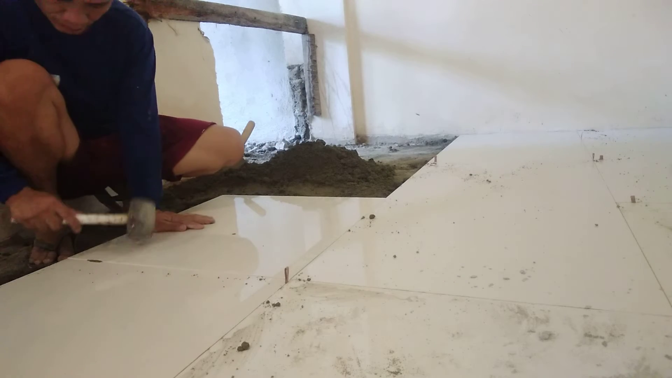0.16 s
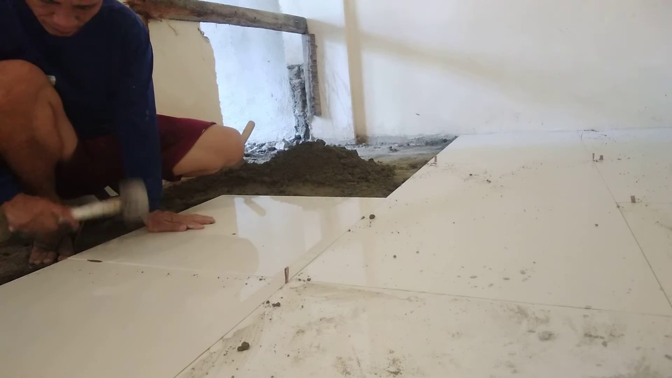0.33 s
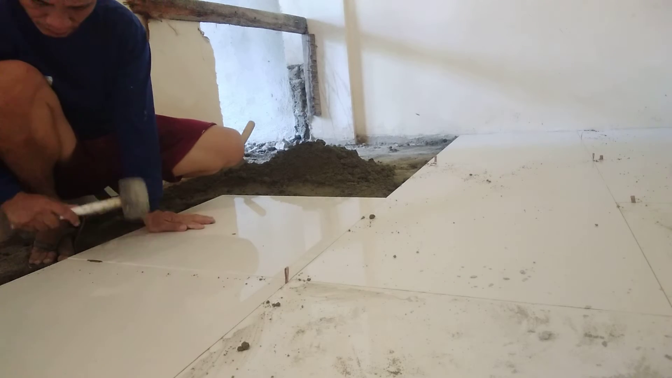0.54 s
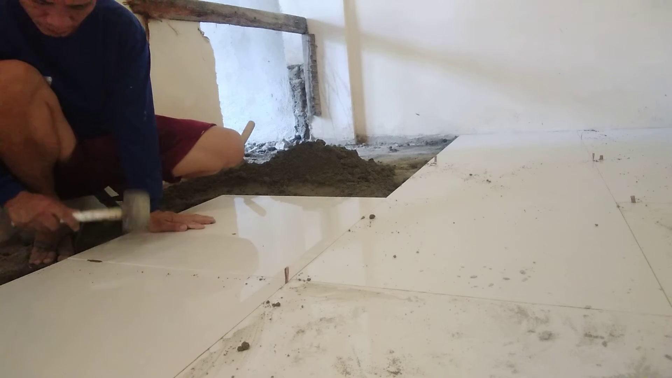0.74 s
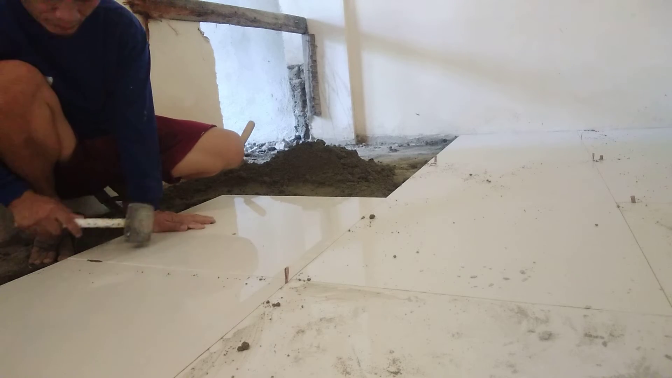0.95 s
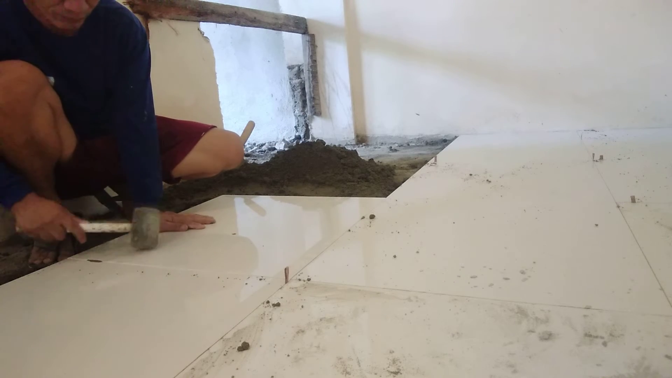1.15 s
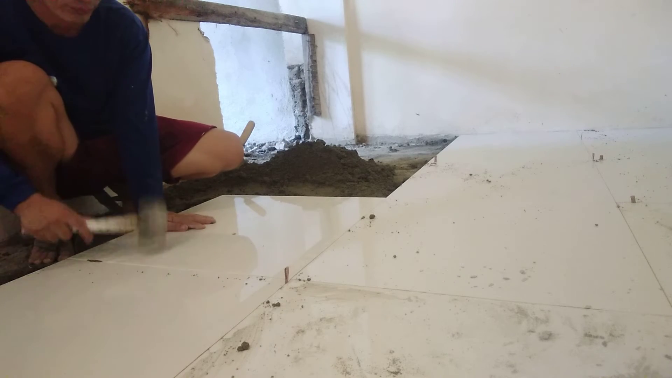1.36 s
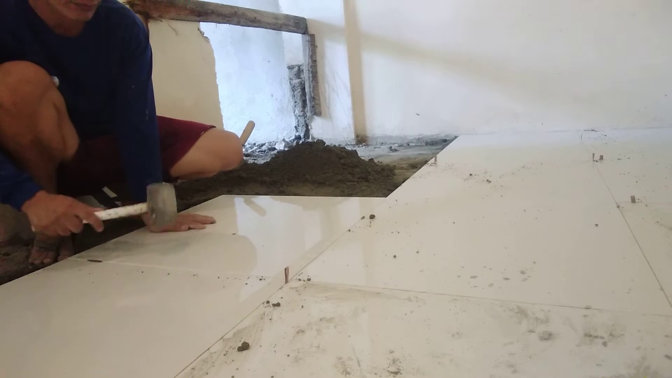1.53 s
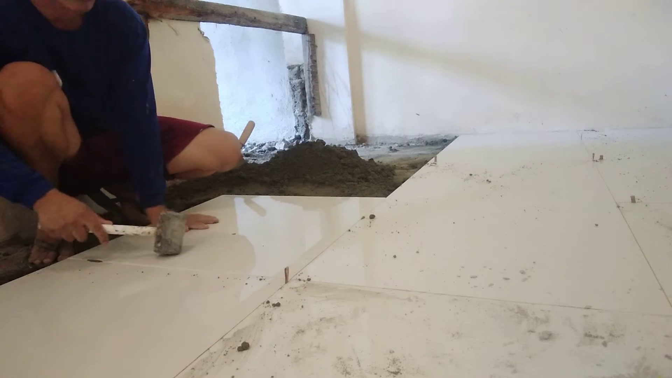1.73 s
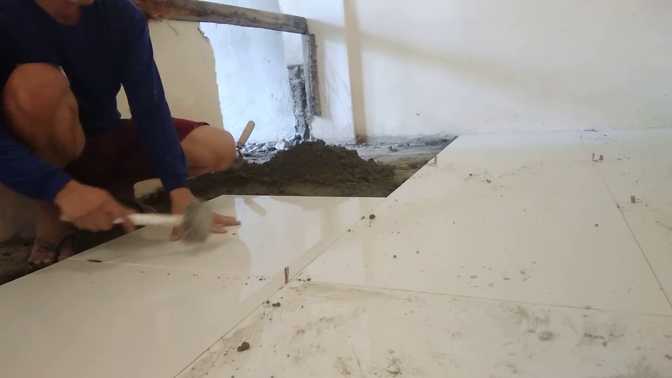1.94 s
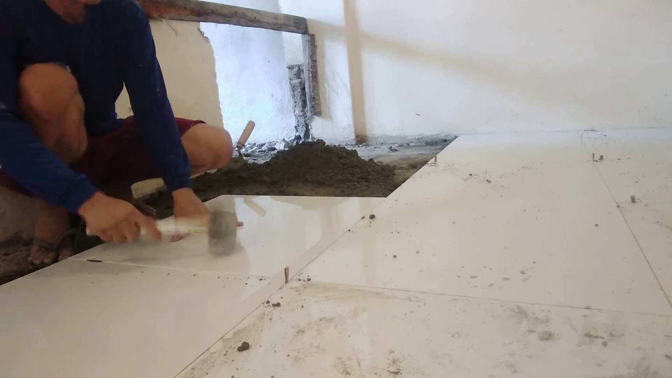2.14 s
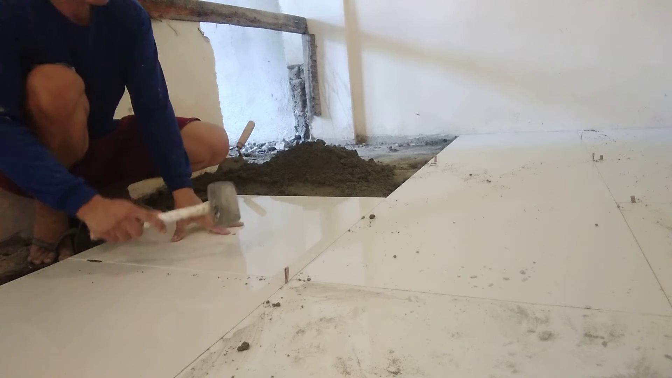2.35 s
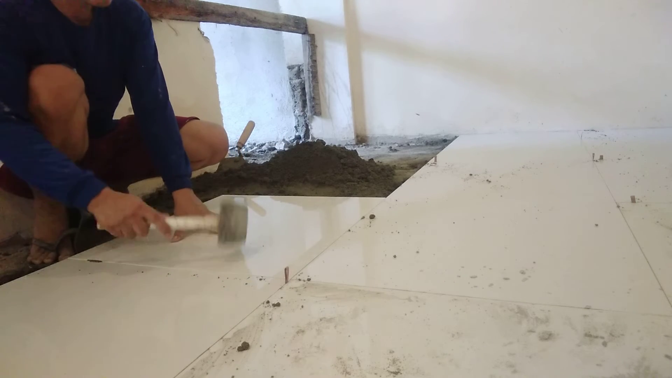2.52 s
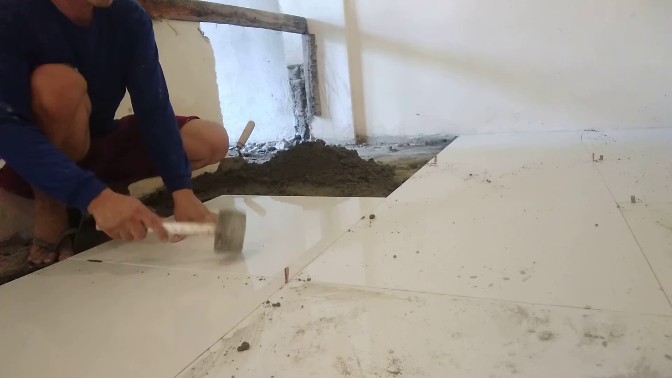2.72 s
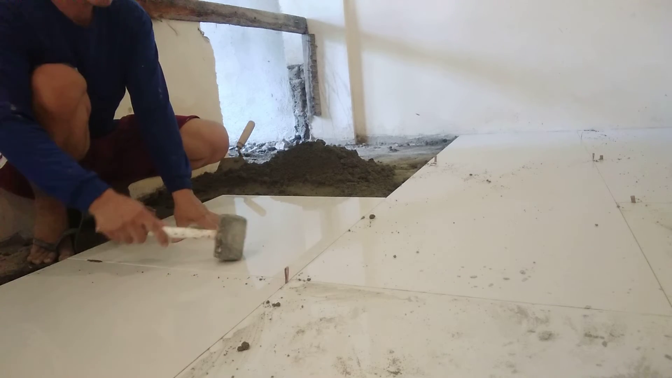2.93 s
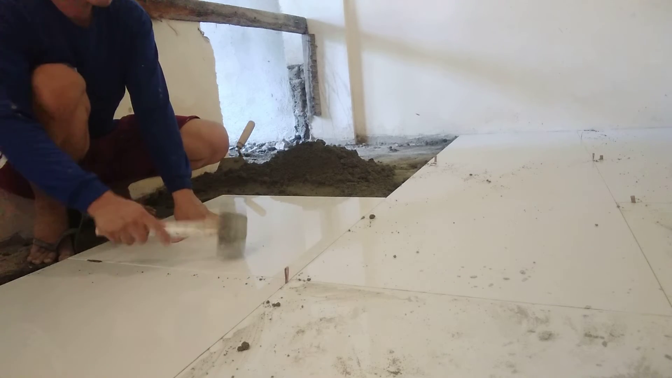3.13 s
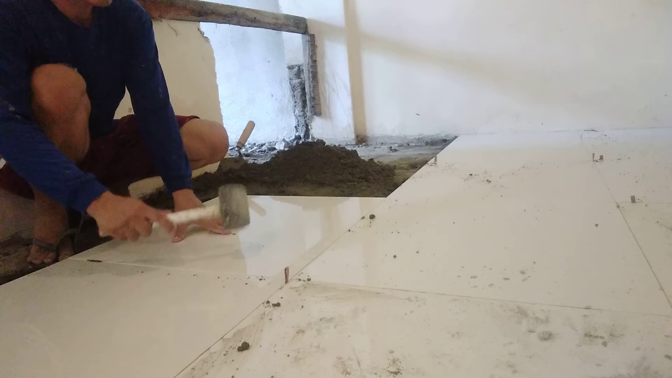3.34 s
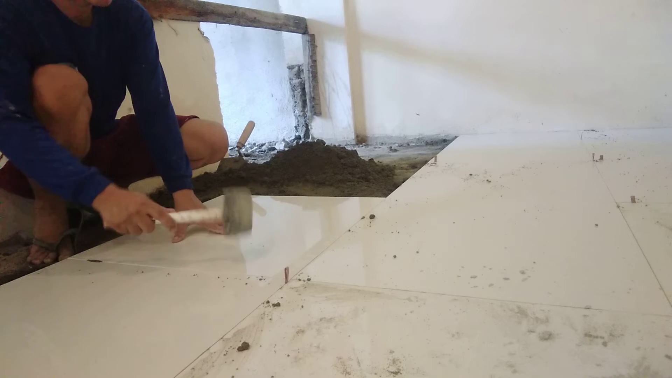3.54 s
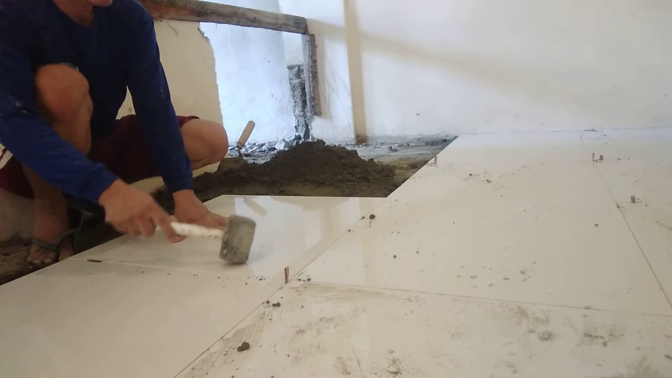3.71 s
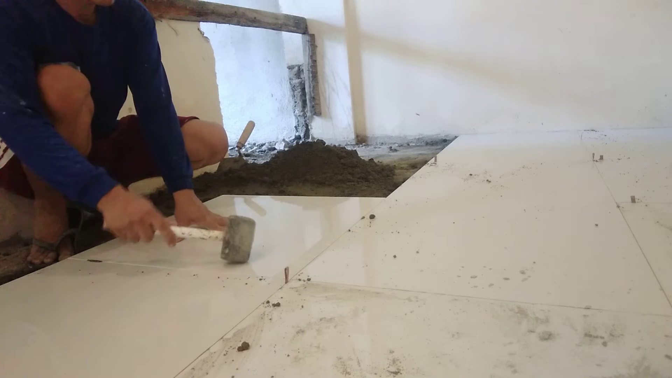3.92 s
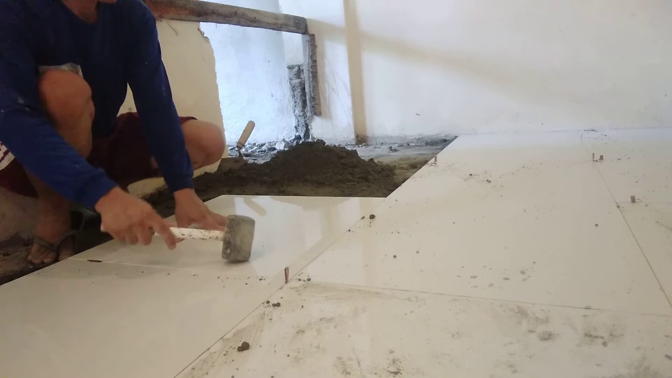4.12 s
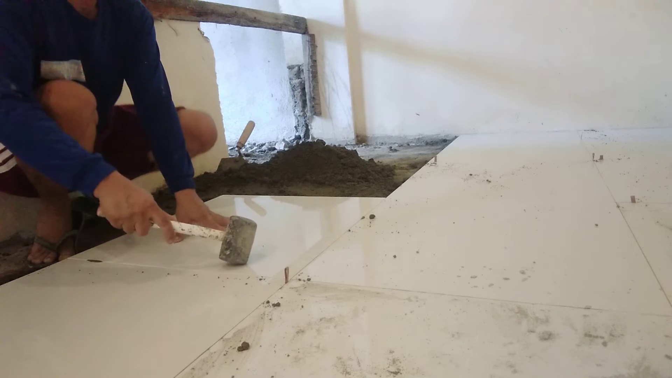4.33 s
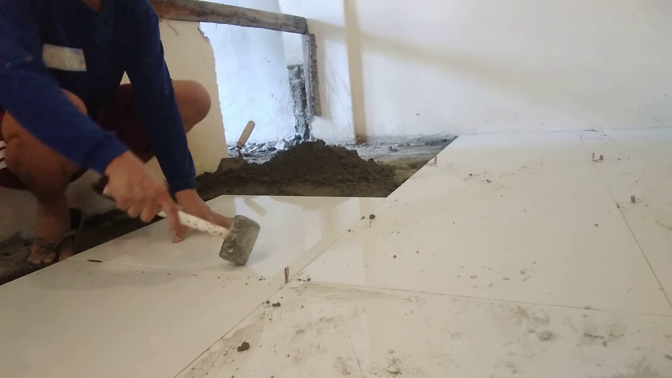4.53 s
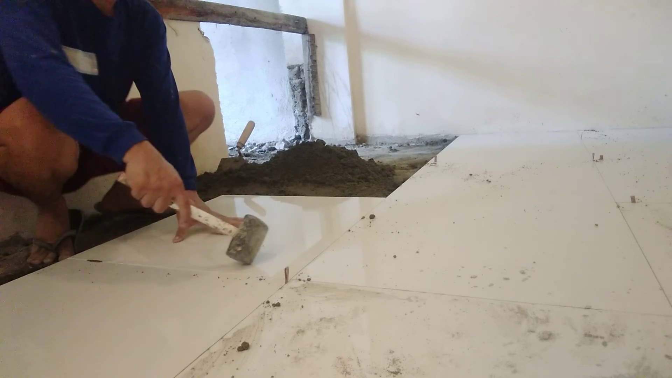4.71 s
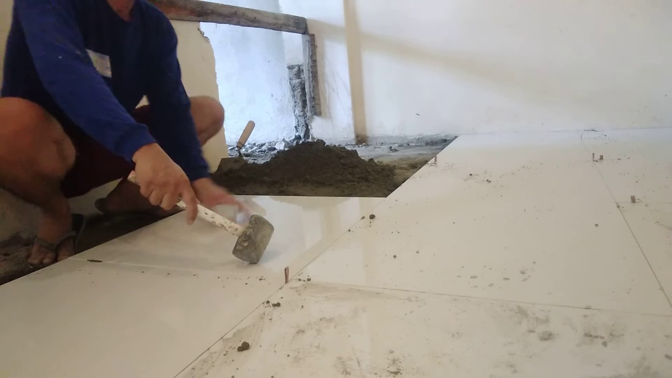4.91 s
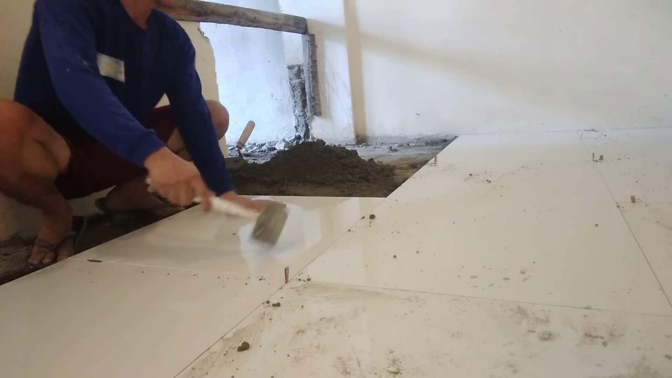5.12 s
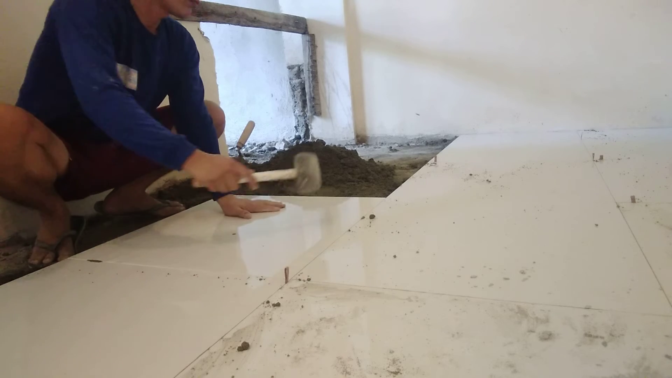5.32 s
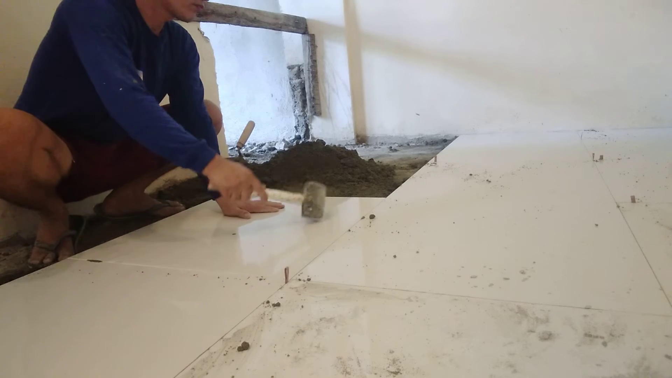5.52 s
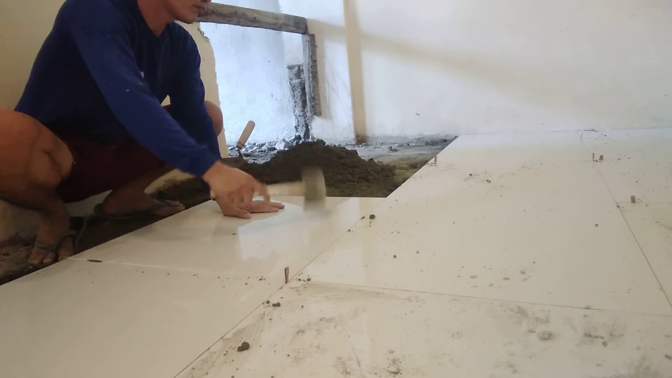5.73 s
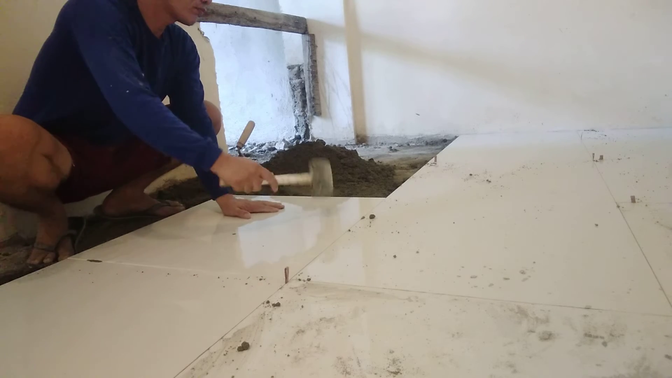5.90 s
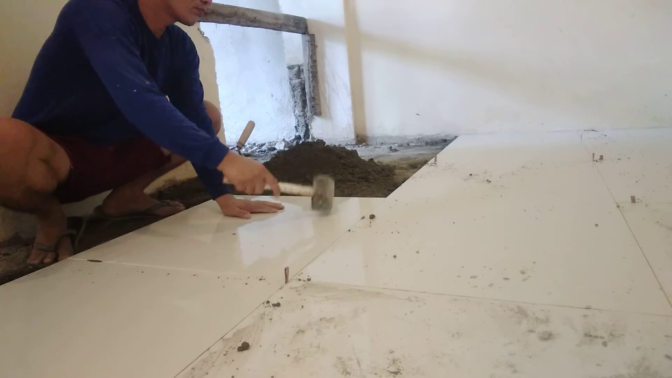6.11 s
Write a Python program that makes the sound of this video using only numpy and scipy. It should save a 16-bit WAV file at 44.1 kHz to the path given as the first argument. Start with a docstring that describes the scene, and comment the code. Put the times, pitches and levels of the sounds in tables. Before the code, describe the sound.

Evenly spaced hollow mallet thuds on a mortar-bedded tile, each with a gritty click and roomy boom, pausing briefly for sandy scuffing and shifting.

```python
"""A rubber mallet beds a large ceramic floor tile in fresh mortar: three runs of taps on three spots.
Each tap sums damped bending modes, clicks and crushed grit, and booms on in lingering resonances and
the diffuse field of a bare plastered room. Feet, hand and mallet scuff the gritty floor as enveloped
noise with narrow squeaks, over the low noise of the room and a few faint tones.
A small microphone with a bright top and a peak limiter picks it up."""
import sys
import numpy as np
from scipy import signal
from scipy.fft import rfft, irfft
from scipy.io import wavfile
from scipy.ndimage import uniform_filter1d, minimum_filter1d

SR = 44100
rng = np.random.default_rng(int(sys.argv[2]) if len(sys.argv) > 2 else 0)


def file_out(sig):
    """Save sig as 16-bit WAV at sys.argv[1]."""
    # one column per channel
    cols = np.atleast_2d(sig).T
    # limit, then scale
    lim = np.clip(cols, -1, 1)
    pcm = np.round(lim * 32767).astype(np.int16)
    wavfile.write(sys.argv[1], SR, pcm)


N = 271656


def amp(db):
    """Level to gain: 20 dB is a factor of ten in amplitude."""
    return 10 ** (np.asarray(db) / 20)


def unit(x):
    """Normalisation to an rms of 1."""
    return x / np.sqrt(np.mean(x ** 2) + 1e-20)


def along(points, hz):
    """Interpolation of (f/Hz, value) points on a logarithmic frequency axis."""
    f, v = np.transpose(points)
    return np.interp(np.log(hz + 1), np.log(f + 1), v)


def bell(hz, centre_hz, octaves):
    """Gaussian hump of height 1 in log frequency; octaves is its standard deviation."""
    return np.exp(-.5 * (np.log2((hz + 1) / centre_hz) / octaves) ** 2)


def causal(db):
    """Minimum-phase response by cepstral folding, for a gain in dB on a 1 Hz grid."""
    cepstrum = irfft(np.log(amp(db) + 1e-6), SR)
    cepstrum[1:SR // 2] *= 2
    cepstrum[SR // 2 + 1:] = 0
    return np.exp(rfft(cepstrum))


def delayed(s):
    """Pure delay of s seconds: a phase falling linearly with frequency."""
    return np.exp(-2j * np.pi * np.fft.rfftfreq(SR, 1 / SR) * s)


def noise(spectrum, size):
    """Random noise of rms 1, coloured by spectral weighting."""
    weight = amp(along(spectrum, np.fft.rfftfreq(size, 1 / SR)))
    return unit(irfft(rfft(rng.standard_normal(size)) * weight, size))


def burst(t60):
    """Spectrum of an exponentially dying noise burst of energy 1."""
    crackle = rng.standard_normal(SR) * amp(-60 * np.arange(SR) / SR / t60)
    return rfft(crackle / np.linalg.norm(crackle))


def faded(x):
    """Window that takes the last fifth of x to silence."""
    return x * np.clip(np.linspace(5, 0, len(x)), 0, 1) ** 4


def add(track, s, sound):
    """Superposition of a sound on the track from time s, cut at the track's ends."""
    start = round(s * SR)
    part = sound[max(-start, 0):max(N - start, 0)]
    track[max(start, 0):][:len(part)] += part


def room_tail(gap=0.0086, build=0.0039):
    """Diffuse field: one second of dense reflections, even in colour, whose treble decays first."""
    # reverberation time: f/Hz, t60/s
    decay = [(100, 1), (500, 0.74), (1500, 0.64), (4000, 0.56), (8000, 0.56), (16000, 0.37)]
    hz, t, z = signal.stft(rng.standard_normal(SR), SR, nperseg=256)
    dying = z * amp(-60 * t / along(decay, hz)[:, None])
    tail = signal.istft(dying, SR, nperseg=256)[1][:SR]
    # silent for the gap, then a linear rise (both in s)
    swell = np.clip((np.arange(SR) / SR - gap) / build, 0, 1)
    field = rfft(tail * swell)
    # dividing by the smoothed spectrum evens the colour and brings the energy to about 1
    field /= np.sqrt(uniform_filter1d(np.abs(field) ** 2, size=90))
    return rfft(faded(irfft(field, SR) * swell))


def lingering_resonances(spot, t60=0.71, build=0.0018):
    """Lingering resonances: room modes, plus a high ring of the tile near 1.7 kHz, strongest at the first spot."""
    # f/Hz, then level/dB from the first, second and third spot
    resonances = [(71, -58, -51.5, -56), (87.4, -57.5, -57, -54), (109.8, -49, -48.5, -47.5),
                  (135.9, -52.5, -50, -47), (159.3, -59, -56.5, -50), (184.9, -56, -52, -52.5),
                  (196.2, -61, -58.5, -53), (235.8, -69, -74.5, -54), (287, -52.5, -54, -64),
                  (301.9, -63, -57, -57.5), (331, -81, -68, -61), (362.6, -56, -100, -65),
                  (388.3, -59, -65, -60.5), (431, -62.5, -58, -64), (455, -58.5, -60, -58),
                  (482.6, -53.5, -71, -73), (508.5, -65.5, -63.5, -75), (542, -65, -65, -62.5),
                  (567, -62, -60.5, -69), (643, -57, -62, -75), (643, -97, -58.5, -64),
                  (698, -74, -54.5, -53), (740, -57.5, -57.5, -65), (781, -55, -88, -78),
                  (848, -55, -72, -78), (932, -56, -77, -66), (1010, -58, -67, -78), (1727, -48, -68, -75)]
    # they begin after 7 ms and then build up
    t = np.maximum(np.arange(SR) / SR - .007, 0)
    ring = np.zeros(SR)
    for hz, *levels in resonances:
        ring += amp(levels[spot]) * np.sin(2 * np.pi * (hz * t + rng.random()))
    return rfft(ring * amp(-60 * t / t60) * (1 - np.exp(-t / build)))


def grit_contact(hz, grit_db):
    """Impact noise: the rubber slaps the glaze and crushes stray sand; more grit sharpens the click."""
    # spectra of slap and crushed sand: f/Hz, level/dB
    click_spectrum = [(500, -39), (3000, -17), (6500, -17), (10000, -25.5), (16000, -26.5)]
    crunch_spectrum = [(500, -32), (3000, -5.5), (6500, -14), (10000, -26.5), (16000, -29)]
    click_db = 5 + 0.5 * grit_db
    click = causal(along(click_spectrum, hz) + click_db) * burst(t60=0.0034) * delayed(0.000205)
    crackle = room_tail() + amp(-5.5) * burst(t60=0.053)
    crunch = causal(along(crunch_spectrum, hz) + grit_db) * crackle
    return click + crunch


def early_reflections(hz, wall_delay, wall_db, ceiling_delay=.0185, ceiling_db=-10):
    """Specular echoes of wall and ceiling, with a first-order absorption of treble above 1 kHz."""
    echoes = amp(wall_db) * delayed(wall_delay) + amp(ceiling_db) * delayed(ceiling_delay)
    return echoes / (1 + 1j * hz / 1000)


def mallet(drift_hz=4200, scatter_db=-11, vary_db=2.5, tile_share=0.2, boom_per_db=2):
    """Struck damped plate: mortar deadens the tile's bending modes to a thud, which drives the room."""
    # taps: t/s, strength/dB, grit under the rubber/dB
    tap_rows = [(-0.13, -7.5, 3), (0.1442, -0.76, -1.5), (0.4087, -1.5, -5.5), (0.6651, -1.15, -2),
                (0.9139, -1, -2.5), (1.1695, 0, 2.5), (1.418, 0.6, 3), (1.6575, 0.36, 3),
                (2.178, -0.77, -7), (2.4278, -1.4, -12), (2.6774, -1.1, -12), (2.9277, -0.8, -9),
                (3.1769, -0.5, 0), (3.4197, -0.63, -1), (3.6691, -1.04, 0.6), (3.9116, -0.75, 0),
                (4.1464, -1.1, -7), (5.5073, -1.45, -4.5), (5.7878, -1.2, -6.5), (6.0568, -1.6, -2.5)]
    # times when the mallet moves to a new spot: t/s
    moves = [1.9, 5.0]
    # spots: level/dB, boom/dB, wall echo delay/s, wall echo level/dB
    spots = [(-0.73, -3, 0.0097, -6), (0.32, -1.06, 0.011, -5.5), (0, 2.5, 0.016, -8)]
    # spectrum of the thud: f/Hz, level/dB
    thud = [(20, -29), (45, -2), (100, 18), (180, 27.5), (300, 24.5), (550, 26), (850, 19), (1150, 14.5),
            (2000, 9), (3000, 1), (4500, -10.5), (7000, -26), (16000, -33.5)]
    # diffuse field against the direct sound: f/Hz, level/dB
    wet = [(40, 8), (110, -12), (220, 2), (340, -1), (500, 1.5), (700, 1.5), (1500, 2.5), (4000, -1),
           (16000, 1.5)]
    # heavily damped bending modes: f/Hz, width/Hz, then boost/dB at the first, second and third spot
    tile_modes = [(198, 79, 4.5, 3.5, 2), (298, 56, 2.5, -1.5, 5.5), (404, 41, 1, -6.5, 0),
                  (560, 145, -1.5, 4, 3.5), (660, 91, 3, 2, -5.5), (912, 210, 1.5, 6.5, 6),
                  (1080, 117, -7, -7, -11), (1240, 210, 2.5, 3.5, 0), (1620, 190, 1, -5, 5),
                  (2520, 420, 4.5, -6, 5.5), (3252, 116, 1, 1, 3)]
    out, hz = np.zeros(N), np.fft.rfftfreq(SR, 1 / SR)
    taps, tile = np.array(tap_rows), np.array(tile_modes)
    mode_hz = tile[:, 0]
    humps = 1 / (1 + (2 * (hz - tile[:, :1]) / tile[:, 1:2]) ** 2)
    spot_of = np.searchsorted(moves, taps[:, 0])
    # the mallet never lands twice on quite the same point, which reshuffles the short waves most
    kept = np.exp(-.5 * (hz / drift_hz) ** 2)
    spread_db = vary_db * mode_hz / mode_hz.mean()
    for k, (spot_db, spot_boom_db, wall_delay, wall_db) in enumerate(spots):
        # taps on one spot share the low-frequency reflections and the lingering resonances
        field, lingering = room_tail(), lingering_resonances(k)
        walls = early_reflections(hz, wall_delay, wall_db)
        # the tiler's body and the mortar heap scatter a little before the walls answer
        near = amp(scatter_db) * burst(t60=0.027) * delayed(0.00196)
        for s, db, grit_db in taps[spot_of == k]:
            field = kept * field + np.sqrt(1 - kept ** 2) * room_tail()
            # a harder tap booms more
            boom_db = spot_boom_db + boom_per_db * db
            blow = along(thud, hz) + spot_db + db + boom_db * bell(hz, 149, 0.76)
            # a shallow dip round 2.2 kHz
            blow = blow - 1.4 * bell(hz, 2200, 1.0)
            mode_db = tile[:, 2 + k] + spread_db * rng.standard_normal(len(tile))
            ring = mode_db @ humps
            knock = causal(blow + ring) * (1 + near + walls)
            # the room gathers sound from all sides of the tile, which evens out its modes
            after_sound = lingering + field * amp(along(wet, hz))
            boom = causal(blow + tile_share * ring) * after_sound
            add(out, s, faded(irfft(grit_contact(hz, grit_db) - knock - boom, SR)))
    return out


def rub(layers, rise, t60, rough_db=3, grain_db=5, direct=0.74, wet=0.64):
    """Granular friction: one stroke of modulated noise in the room; layers are (level/dB, gain over f)."""
    t = np.arange(SR) / SR
    # the stroke swells, steeply at first, and dies away
    stroke = np.minimum(t / rise, 1) ** 0.68 * amp(-60 * np.maximum(t - rise, 0) / t60)
    # a short rasp as it catches on touching down, with a t60 of 0.04 s
    stroke = stroke + amp(-5.5 - 60 * t / 0.04)
    # grains of very unequal size break loose in clumps
    clumps_db = rough_db * unit(uniform_filter1d(rng.standard_normal(SR), size=60))
    sizes = amp(clumps_db + grain_db * rng.standard_normal(SR))
    sound = np.zeros(SR)
    for db, colour in layers:
        grains = sizes * rng.standard_normal(SR)
        sound += amp(db) * unit(irfft(rfft(grains) * colour, SR))
    return signal.fftconvolve(stroke * sound, irfft(direct + wet * room_tail(), SR))


def scuffs(squeak_hz=6220, squeak_width_hz=400):
    """Sliding friction: sand grinds and hisses, with a narrow-band squeak where it sticks and slips."""
    # scuffs of feet, hand and mallet: t/s, swell/s, t60/s, grind/dB, hiss/dB, hiss tilt/dB per octave
    strokes = [(-0.1, 0.033, 0.29, -33.5, -42.5, 1), (0.0903, 0.042, 0.065, -29, -37, 7.5),
               (1.994, 0.027, 0.36, -21, -35.5, -2.5), (4.508, 0.011, 0.69, -61, -52, -1),
               (4.578, 0.013, 0.82, -49.5, -51.5, -3.5), (5.052, 0.12, 0.48, -58.5, -46, 4.5),
               (5.201, .14, 1, -54, -54, -1.5), (5.919, .036, 0.93, -66, -54, -4)]
    # squeaks: t/s, level/dB
    squeaks = [(0.116, -48), (2.084, -42), (4.515, -59), (5.122, -49)]
    # spectra of the two layers: f/Hz, level/dB
    grind_spectrum = [(60, -23), (400, -1.5), (750, 6.5), (1200, 4.5), (2500, -2.5), (4500, -19.5),
                      (7000, -22), (16000, -99)]
    hiss_spectrum = [(300, -28), (2000, 2), (5000, 2.5), (7000, 0), (9500, -6.5), (16000, -11.5)]
    out, hz = np.zeros(N), np.fft.rfftfreq(SR, 1 / SR)
    grind = amp(along(grind_spectrum, hz))
    squeak = 1 / (1 + (2 * (hz - squeak_hz) / squeak_width_hz) ** 2)
    for s, swell, t60, grind_db, hiss_db, tilt_db in strokes:
        hiss = amp(along(hiss_spectrum, hz) + tilt_db * np.log2(1 + hz / 2000))
        add(out, s, rub([(grind_db, grind), (hiss_db, hiss)], swell, t60))
    for s, db in squeaks:
        add(out, s, rub([(db, squeak)], rise=0.012, t60=0.14))
    return out


def room_air():
    """Broadband ambience: the soft low rush of the room as coloured noise of slowly varying level."""
    # t/s, level/dB
    air_level = [(4.6, -48), (4.924, -48.5), (5.46, -57.5)]
    # spectrum: f/Hz, level/dB
    ambience = [(20, -28), (70, -2), (140, -4.5), (205, 5.5), (280, -4.5), (600, -6.5), (1400, -14),
                (3000, -22.5), (7000, -36), (10000, -42.5), (16000, -47.5)]
    level_db = np.interp(np.arange(N) / SR, *np.transpose(air_level))
    return amp(level_db) * noise(ambience, N)


def tones(waver_hz=18):
    """Frequency modulation: faint thin sines whose pitch wavers at random, by waver_hz rms."""
    # t/s, length/s, f/Hz, level/dB
    tone_rows = [(4.882, .17, 12592, -70), (4.974, .11, 8613, -67), (5.082, 0.33, 1367, -63),
                 (5.182, 0.31, 1250, -63), (6.056, 0.095, 5286, -58), (6.07, 0.078, 6541, -61)]
    out = np.zeros(N)
    for s, length, hz, db in tone_rows:
        size = max(int(length * SR), 2)
        pitch = hz + waver_hz * unit(uniform_filter1d(rng.standard_normal(size), size=150))
        sine = np.sin(2 * np.pi * np.cumsum(pitch) / SR)
        add(out, s, amp(db) * unit(signal.windows.tukey(size) * sine))
    return out


def scene():
    """Linear superposition of taps, scuffs, room air and tones."""
    return (mallet() + scuffs() + room_air() + tones())[None]


def record(dry, ceiling_db=-6, top_hz=16100):
    """Transducer chain: microphone response, fast peak limiting, then a low-pass band limit."""
    # microphone response: f/Hz, gain/dB
    microphone = [(4500, 1.5), (5500, 1.5), (6200, 7), (7000, 10), (8000, 2), (10000, 1), (13000, 4),
                  (15700, 16), (16500, -13)]
    hz = np.fft.rfftfreq(SR, 1 / SR)
    x = signal.fftconvolve(dry[0], irfft(causal(along(microphone, hz)), SR))[:N]
    needed = np.minimum(1, amp(ceiling_db) / (np.abs(x) + 1e-9))
    # the lowest gain nearby, smoothed, ducks just ahead of each peak
    gain = uniform_filter1d(minimum_filter1d(needed, size=41), size=41)
    band_limit = signal.firwin(numtaps=255, cutoff=top_hz, fs=SR)
    return signal.fftconvolve(x * gain, band_limit, mode="same")[None]


dry = scene()
out = record(dry)
file_out(out)
```